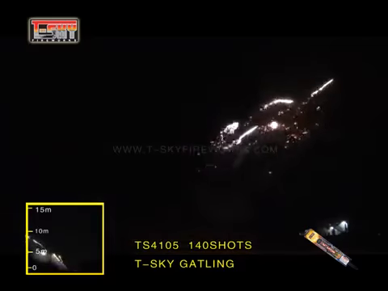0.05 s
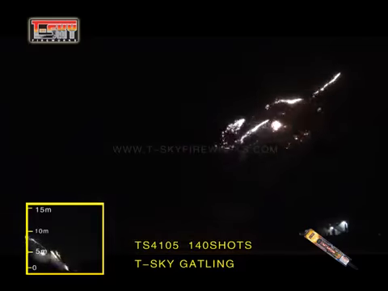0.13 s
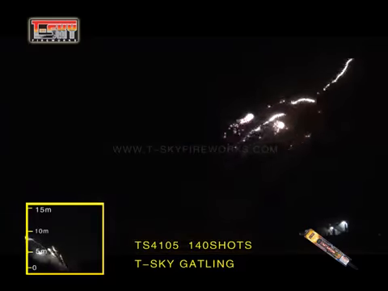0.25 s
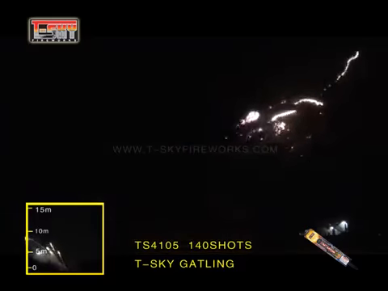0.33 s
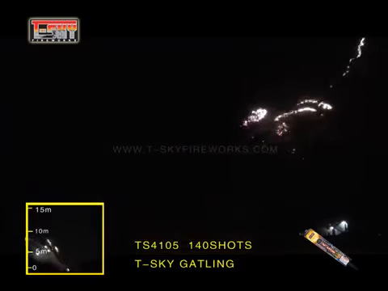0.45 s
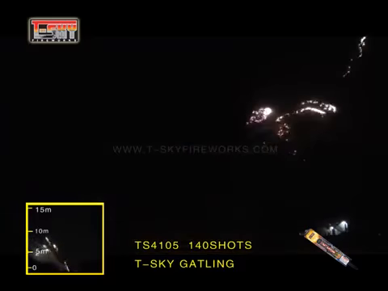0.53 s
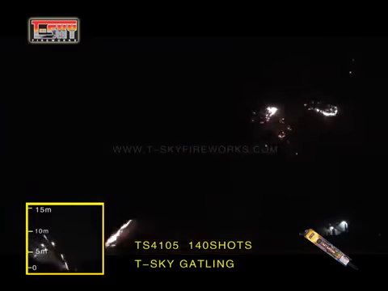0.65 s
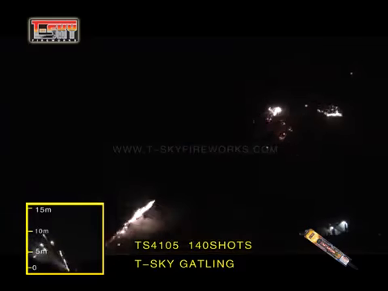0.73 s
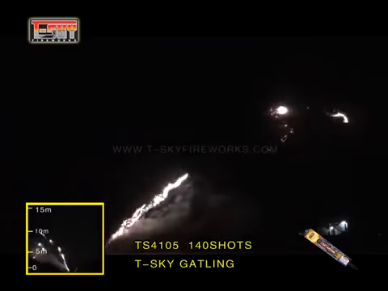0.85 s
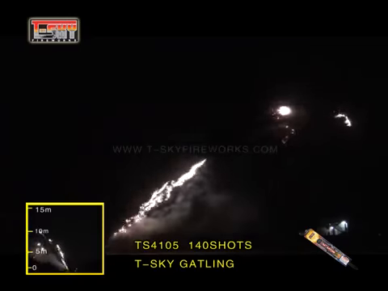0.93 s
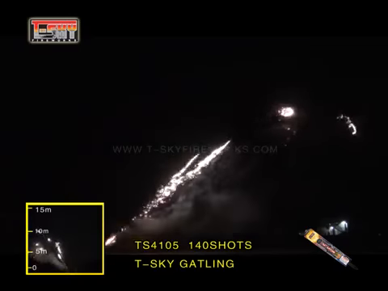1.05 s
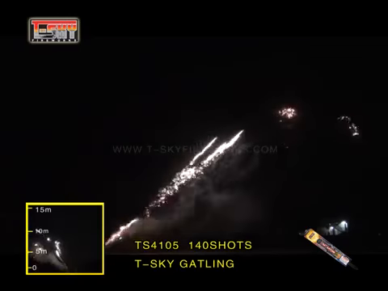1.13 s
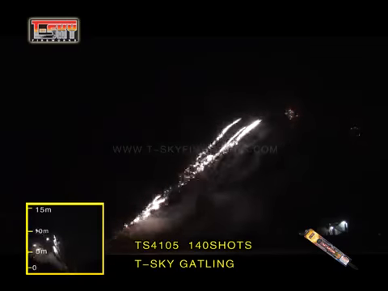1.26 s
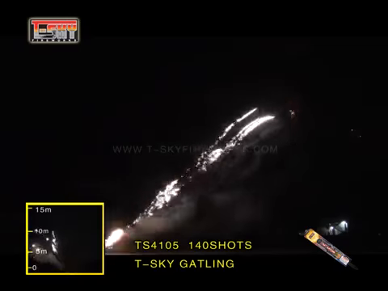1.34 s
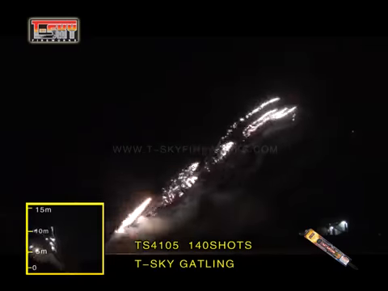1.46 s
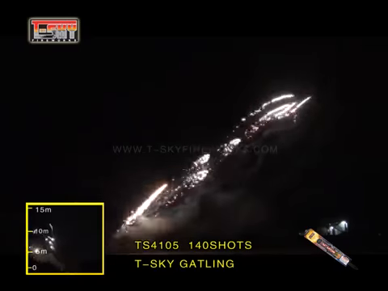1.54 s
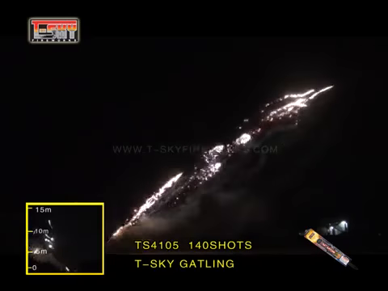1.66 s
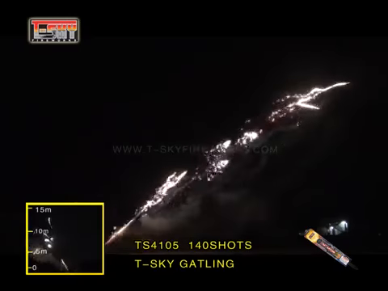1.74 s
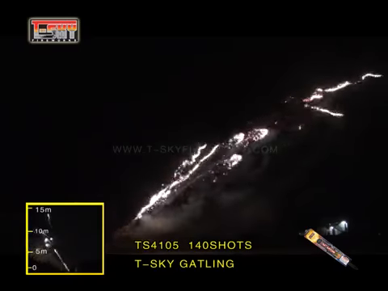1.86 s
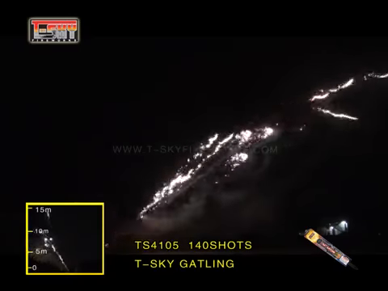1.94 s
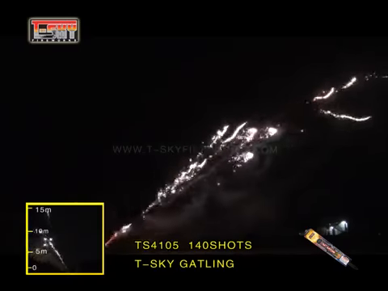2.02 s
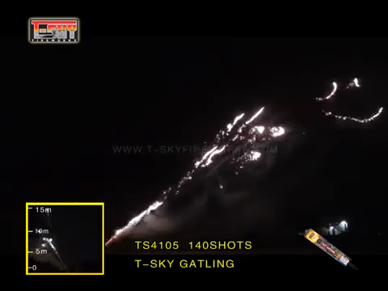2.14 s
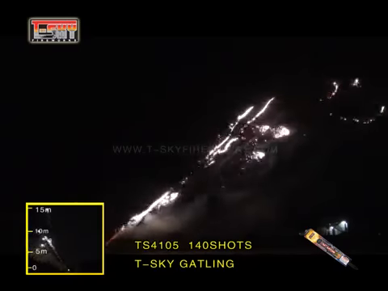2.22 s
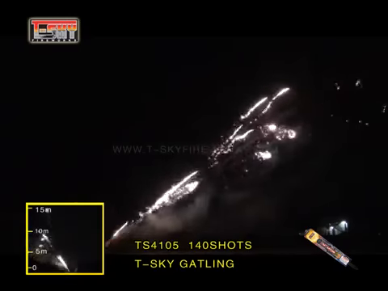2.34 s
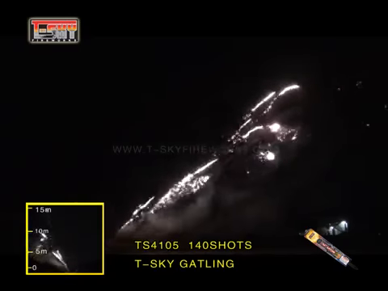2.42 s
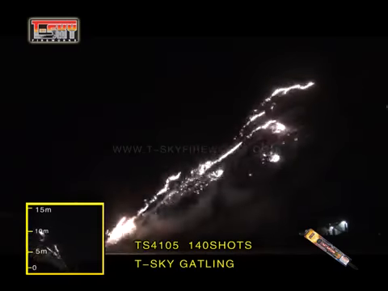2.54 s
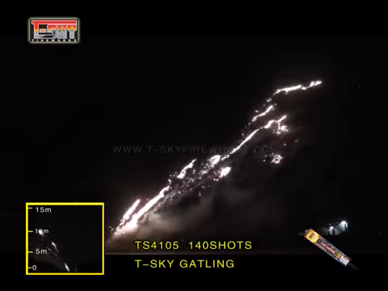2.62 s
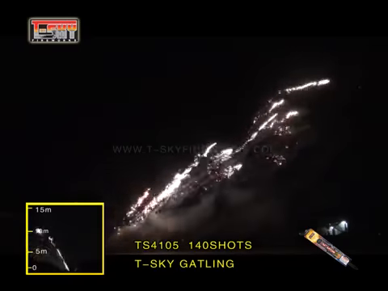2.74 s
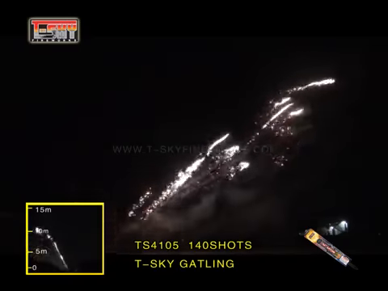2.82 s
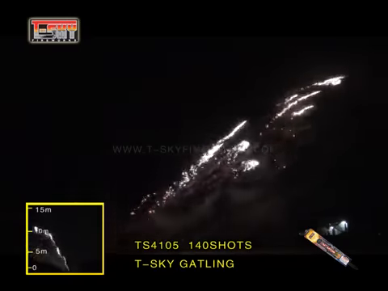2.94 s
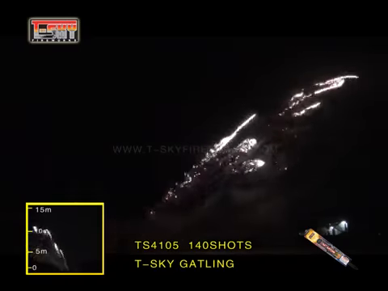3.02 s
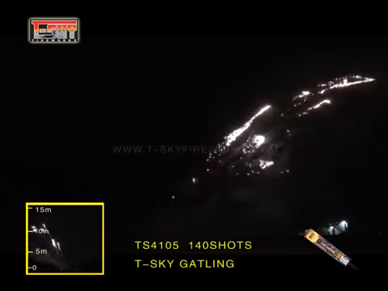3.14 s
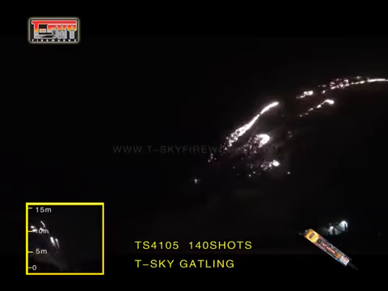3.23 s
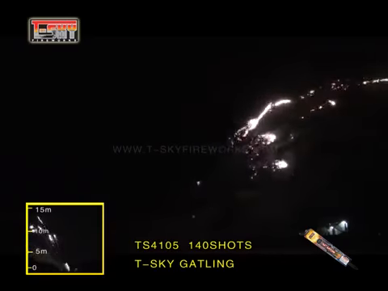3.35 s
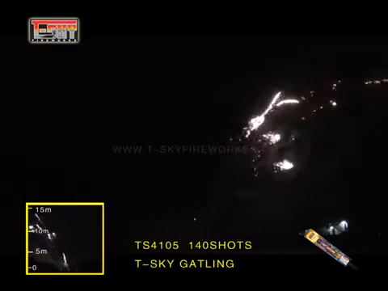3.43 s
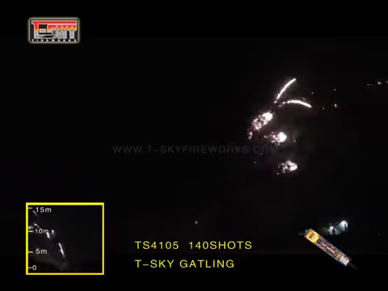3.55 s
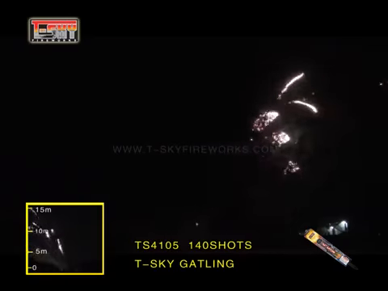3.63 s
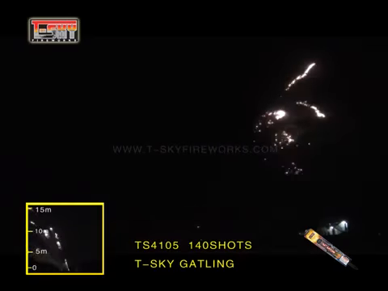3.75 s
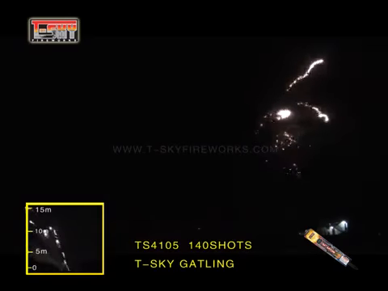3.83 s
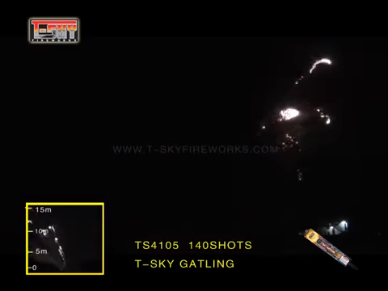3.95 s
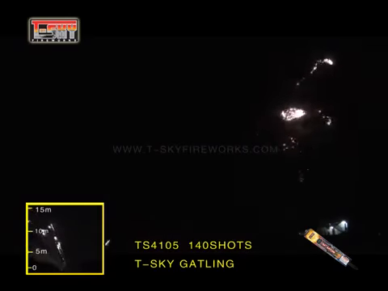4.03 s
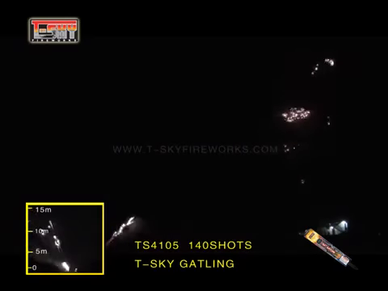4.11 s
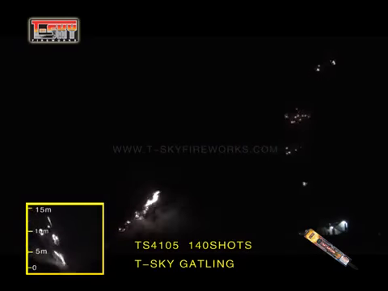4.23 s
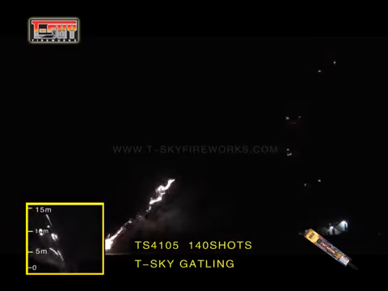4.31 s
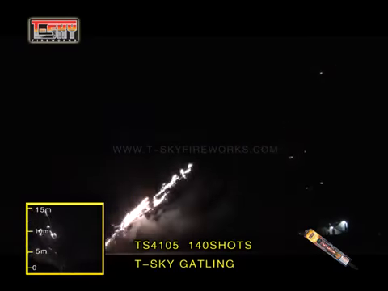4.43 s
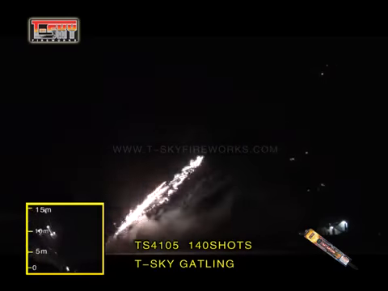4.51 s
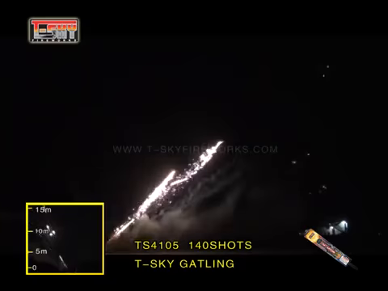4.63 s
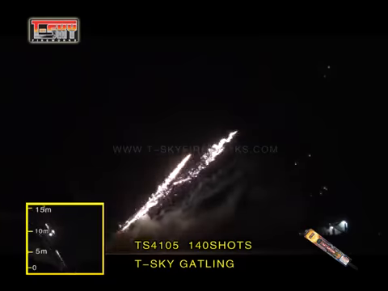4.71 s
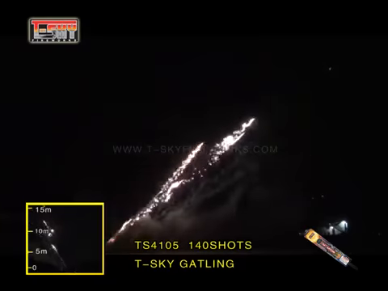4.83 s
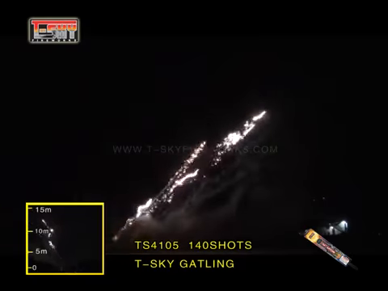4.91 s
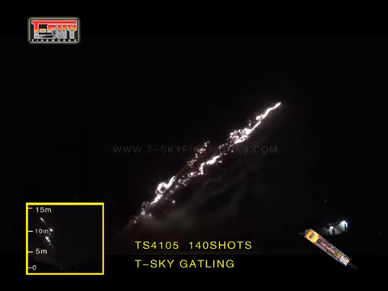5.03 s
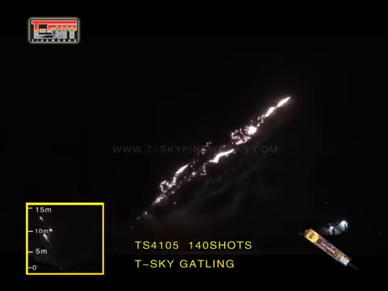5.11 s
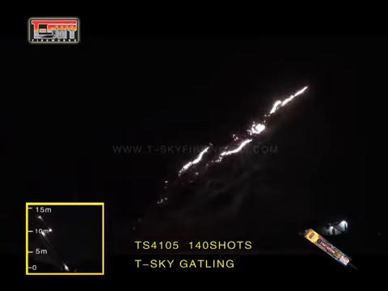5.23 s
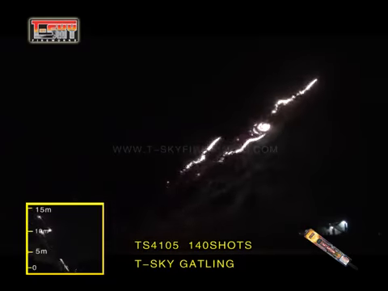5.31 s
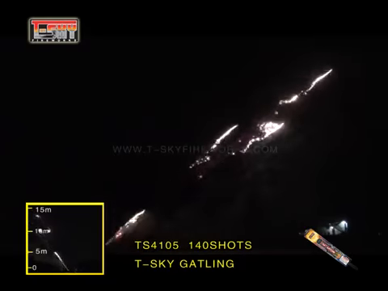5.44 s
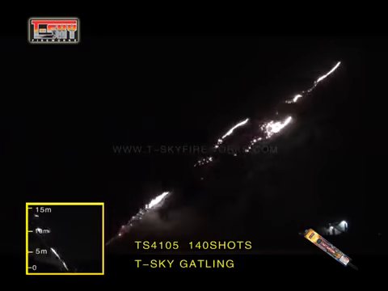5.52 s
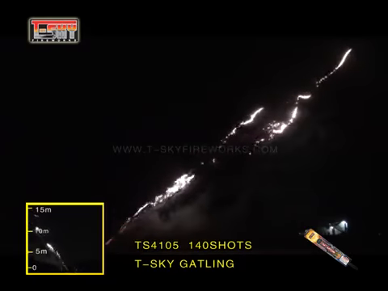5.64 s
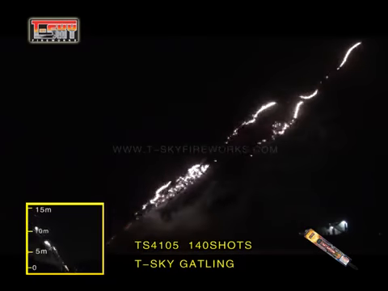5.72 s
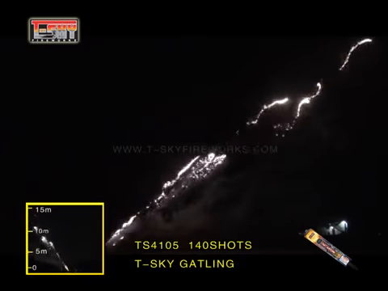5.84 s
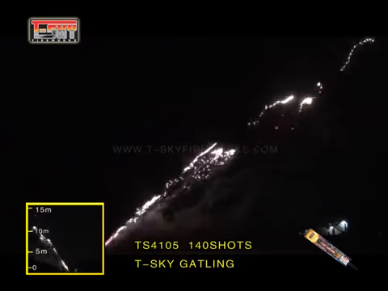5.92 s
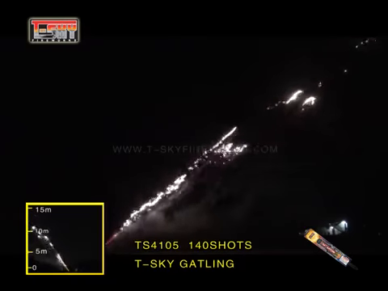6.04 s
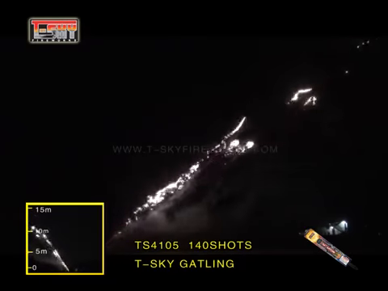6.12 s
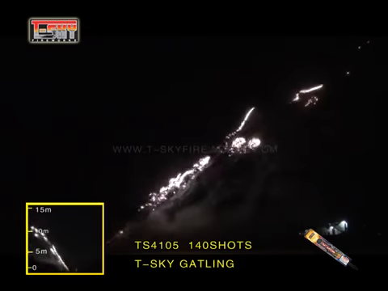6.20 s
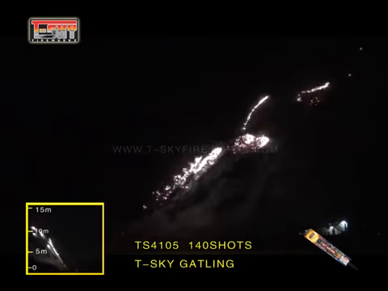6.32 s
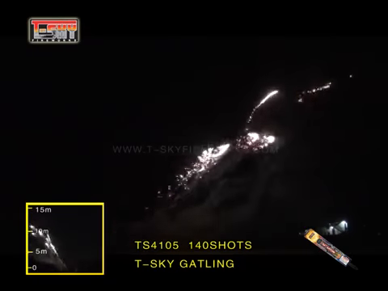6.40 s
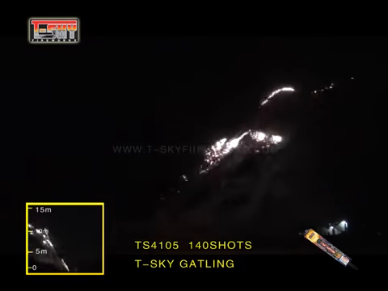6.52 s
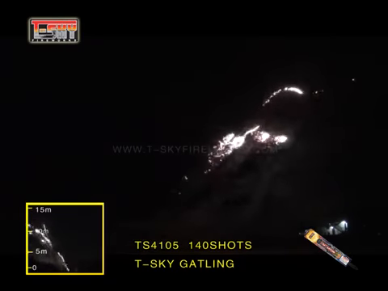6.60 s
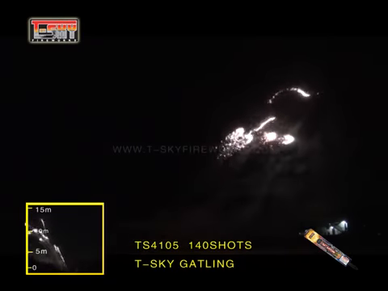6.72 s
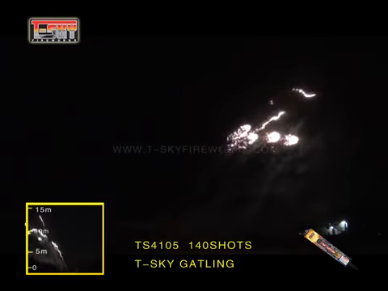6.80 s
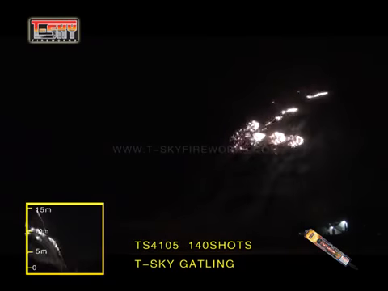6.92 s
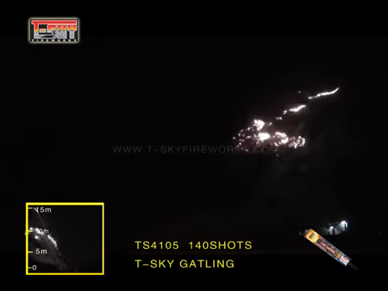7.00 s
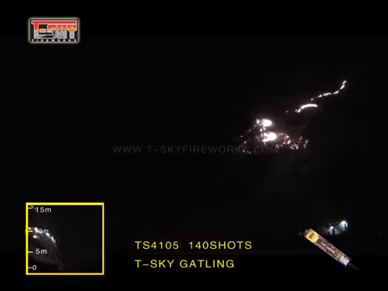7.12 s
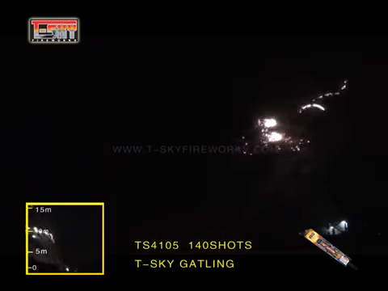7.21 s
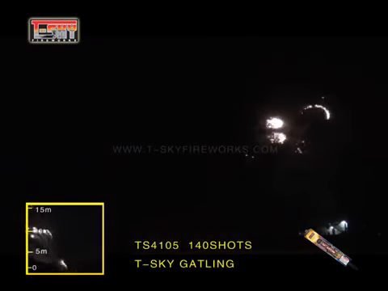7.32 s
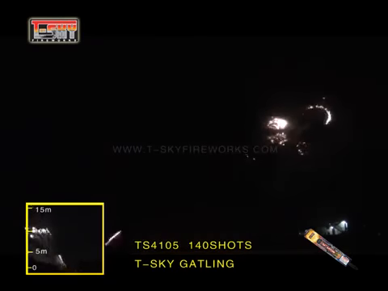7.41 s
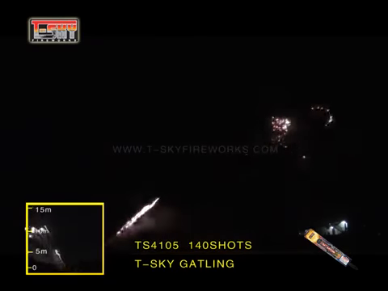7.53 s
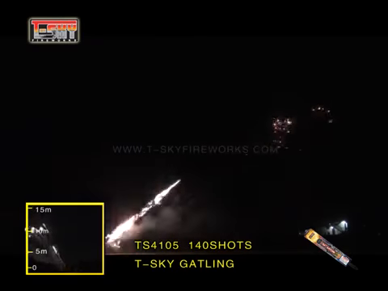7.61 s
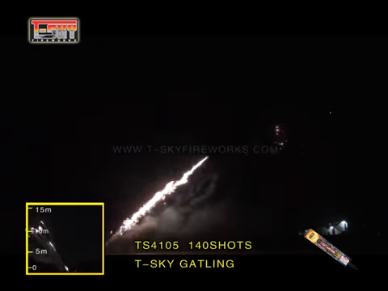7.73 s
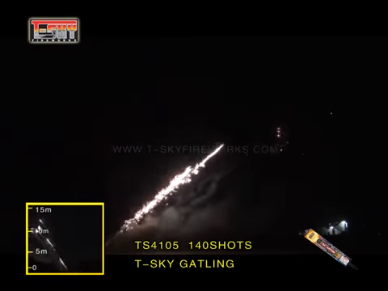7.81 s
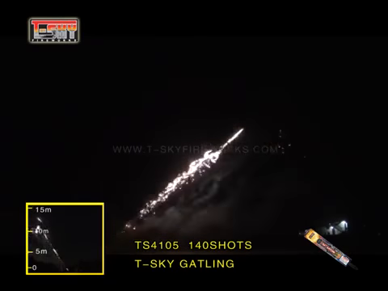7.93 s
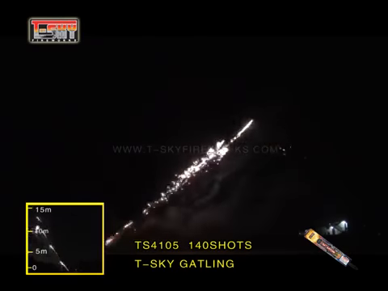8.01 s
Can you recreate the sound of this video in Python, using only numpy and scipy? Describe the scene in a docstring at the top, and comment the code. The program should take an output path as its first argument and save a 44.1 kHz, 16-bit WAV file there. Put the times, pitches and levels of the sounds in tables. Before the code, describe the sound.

Outdoors at night, a firework tube fires salvos of whistling stars. Piercing, raspy tones overlap, jumping high then gliding down and fluttering, with gas hiss and fine spark crackle. Dry pops cluster as shots leave, the hardest around four and a half seconds. Between salvos the whistles thin out. Low thumps roll briefly in the distance; a camera microphone ducks around the loudest pops.

```python
"""Whistling stars from a roman candle at night, in salvos, heard by a camera with two microphone ports.
Each star is a harmonic tone with half tones between, gliding and roughening as its tube burns; gas hisses along.
Lift charges are pressure pulses with echoes; sparks are tiny pulses over hiss; far shells thump and roll.
A light breeze lies underneath, and the camera's look-ahead limiter ducks everything around the loudest pops.
"""
import sys
import numpy as np
from scipy import signal
from scipy.fft import rfft, irfft, next_fast_len
from scipy.io import wavfile
from scipy.ndimage import uniform_filter1d, minimum_filter1d, map_coordinates

SR = 44100
rng = np.random.default_rng(int(sys.argv[2]) if len(sys.argv) > 2 else 0)


def inscribe(sig):
    """Save sig as 16-bit PCM at rate SR to the path in sys.argv[1].

    A 1-D sig is mono; a 2-D sig holds one channel per row.
    Samples are clipped to [-1, 1] before scaling.
    """
    pcm = np.round(np.clip(np.atleast_2d(sig).T, -1, 1) * 32767)
    wavfile.write(sys.argv[1], SR, pcm.astype(np.int16))


N = 355442


def amp(db):
    """Gain of a level in dB."""
    return 10 ** (np.asarray(db) / 20)


def unit(x):
    """Scaled to rms 1."""
    return x / np.sqrt(np.mean(x ** 2) + 1e-20)


def along(points, hz):
    """(frequency [Hz], value) points read on a log frequency axis."""
    f, v = np.transpose(points)
    return np.interp(np.log(hz + 1), np.log(f + 1), v)


def wobble(rate, size=N):
    """A smooth random curve with rate knots a second."""
    knots = rng.standard_normal(int(size * rate / SR) + 4)
    return map_coordinates(knots, [np.arange(size) * rate / SR])


def filtered(x, response):
    """x filtered by a complex response of frequency [Hz]."""
    m = next_fast_len(N + 8192)
    return irfft(rfft(x, m) * response(np.fft.rfftfreq(m, 1 / SR)), m)[..., :N]


def noise(spectrum, spread):
    """Coloured stereo noise of rms 1; spread weights the part that is opposite at the two ports."""
    mid, side = filtered(rng.standard_normal((2, N)), lambda hz: amp(along(spectrum, hz)))
    return unit(np.array([mid + spread * side, mid - spread * side]))


def blast(push_ms):
    """A pressure push of peak 1, lasting push_ms, then a suction; the air has rounded its front."""
    u = np.arange(300) / SR / (push_ms / 1000)
    front = 1 - np.exp(-u / .1)
    pulse = (1 - u) * np.exp(-u) * front
    return pulse / pulse.max()


def breeze(level_db=-58):
    """Light wind on the microphone: low noise that differs partly between the ports."""
    return amp(level_db) * noise([(15, -5), (50, -11), (120, -23.5), (400, -80)], spread=0.44)


# Levels of the surroundings before the microphone:
# (time [s], rolling rumble [dB], spark crackle [dB])
SURROUNDINGS = [(0, -43.5, -39.5), (.3, -42, -47.5), (.72, -52.5, -39.5), (1.0, -42, -42),
                (1.4, -41, -38.5), (1.7, -49, -30.5), (2.0, -48.5, -35), (2.35, -46.5, -38),
                (2.698, -46, -40), (3.1, -52.5, -41.5), (4.4, -50.5, -46), (4.65, -56, -39.5),
                (5.05, -68, -43), (5.5, -53.5, -43), (6.2, -73, -40.5), (7.45, -66.5, -45),
                (7.8, -48, -38.5), (8.06, -63, -41)]
# Far shells and their strongest returns:
# (time [s], thump level [dB], thump pitch [Hz], tail level [dB], tail 60 dB decay [s])
FAR_SHELLS = [(0.7489, -7, 248, -25, 1.5), (0.7541, 4, 213, -36, 1.), (0.819, -22, 230, -28, 0.32),
              (0.844, -19, 228, -24.5, 0.38), (0.886, -10, 153, -37, 0.54), (4.504, -12.5, 197, -33, 0.59)]
# Colour of the rolling noise: (frequency [Hz], relative level [dB per Hz])
ROLL_COLOUR = [(25, -40), (80, -13), (130, -3.5), (220, -1.5), (380, -11), (600, -17.5), (1500, -24.5),
               (4000, -28.5)]


def far_shells_and_rumble():
    """A far shell is a decaying low sine; its tail and the rumble are one noise rolling from all around."""
    s, roll_db, _ = np.transpose(SURROUNDINGS)
    t = np.arange(N) / SR
    swell, thumps = amp(np.interp(t, s, roll_db)), np.zeros(N)
    for at, db, hz, tail_db, t60 in FAR_SHELLS:
        since = np.clip(t - at, 0, None)
        thumps += amp(db - 60 * since / 0.016) * np.sin(2 * np.pi * hz * since)
        tail = (t > at) * amp(tail_db - 60 * since / t60)
        swell = np.hypot(swell, tail)
    roll = swell * amp(3.46 * wobble(25)) * noise(ROLL_COLOUR, spread=0.31)
    return roll + thumps


def sparks(grain_db=3, per_second=500):
    """Sparks crackle as tiny pressure pulses of random size at random moments, over a faint hiss."""
    s, _, spark_db = np.transpose(SURROUNDINGS)
    level_db = np.interp(np.arange(N) / SR, s, spark_db)
    struck = rng.random(N) < per_second / SR
    grains = struck * amp(grain_db * np.minimum(rng.exponential(size=N), 3))
    crackle = unit(np.convolve(grains, blast(push_ms=0.043))[:N])
    hiss = noise([(200, -34.0), (700, -8.0), (2500, -9.0), (9000, -7)], spread=0.1)
    busy = np.clip((level_db + 47.0) / 10, .1, 1)  # single sparks stand out only in a loud shower
    return amp(level_db) * (busy * crackle + hiss)


# Ragged gas bursts as a star leaves the tube:
# (time of the middle [s], half length to 1/e [s], level before the flutter [dB])
GAS_BURSTS = [(2.697, 0.032, -28), (4.667, 0.018, -36)]


def puffs():
    """Gas bursts from the tube: broad noise that swells, sinks and flutters roughly."""
    t = np.arange(N) / SR
    swell = sum(amp(db) * np.exp(-((t - s) / length) ** 2) for s, length, db in GAS_BURSTS)
    flutter = amp(4 * wobble(200))
    return swell * flutter * noise([(400, -15), (3000, -7), (12000, -20)], spread=0.1)


# Lift charges: (time [s], peak level of the direct blast before the microphone [dB])
LIFT_CHARGES = [(0.7395, -13.5), (0.796, -11), (0.8032, -14), (0.9092, -10), (0.9263, -11), (1.192, -12),
                (1.259, -15.5), (1.4663, -23), (1.4739, -14), (1.7204, -10), (1.7275, -10), (1.8426, -13),
                (1.8545, -14.5), (2.147, -16), (2.225, -15), (2.2948, -16.5), (2.496, -17), (2.637, -9),
                (2.6693, -8), (2.673, -10), (2.6774, -12), (2.6833, -9), (2.704, -19), (4.215, -16),
                (4.4666, 5), (4.4719, -3), (4.5023, -9.5), (4.538, -24), (4.6224, -12.5), (4.7532, -13),
                (4.952, -13), (5.5283, -12), (5.7196, -16), (5.9514, -14.5), (6.0628, -14.5),
                (6.1006, -14.5), (7.544, -10.5), (7.587, -11), (7.7211, -10), (7.7265, -11), (7.8337, -5)]


def pops(echo_db=-20):
    """Each lift charge: a blast, a ground bounce and near echoes scattered differently at each port."""
    out, t = np.zeros((2, N + SR)), np.arange(1500) / SR
    fade = amp(-60 * t / .03)
    for s, db in LIFT_CHARGES:
        scatter = rng.standard_normal((2, len(t))) * (rng.random((2, len(t))) < .15)
        path = amp(echo_db) * fade * scatter
        path[:, 0], path[:, round(.0016 * SR)] = 1, .4  # direct blast, and the bounce 1.6 ms later
        stretch = amp(rng.normal(0, 1))  # charges differ a little in size
        shot = signal.fftconvolve(path, blast(push_ms=0.34 * stretch)[None], axes=1)
        out[:, round(s * SR):][:, :shot.shape[1]] += amp(db) * shot
    return out[:, :N]


def echoes(x, t60):
    """Ground and buildings send back a diffuse tail, partly different at each port."""
    t = np.arange(SR // 2) / SR
    both, apart = rng.standard_normal((2, len(t))) * amp(-60 * t / t60) * (t > .006)
    tail = np.array([both + 1.0 * apart, both - 0.087 * apart])
    return signal.fftconvolve(x, tail / np.linalg.norm(tail[0]), axes=1)[:, :N]


# Colour of burning gas: (frequency [Hz], relative level [dB])
GAS_COLOUR = [(300, -20), (1500, -22), (3000, -0.5), (4700, 5.5), (6500, -0.5), (9000, -6), (14500, -22)]


def jets(song, level_db=-20):
    """Burning gas hisses in step with the strength of the whistles."""
    power = uniform_filter1d(np.mean(song ** 2, axis=0), 900)
    burn = np.sqrt(np.abs(power) + 2e-5)  # the small term leaves a faint constant hiss
    return burn * amp(level_db) * noise(GAS_COLOUR, spread=0.04)


# Stars that tumble steadily:
# (time lit [s], turn rate [turns/s], time the mouth faces the camera [s], swing scale [dB])
STEADY_TUMBLES = [(3.91, 25, 4.08, 2), (4.33, 26, 4.415, 4), (7.15, 17.6, 7.318, 8), (7.35, 17, 7.475, 3)]


def tumble(t):
    """Level swing [dB] of a star whose mouth turns towards the camera and away."""
    rate, facing, depth_db = rng.uniform(15, 34), rng.random(), rng.uniform(0.33, 2.81)
    for lit, *steady in STEADY_TUMBLES:
        if abs(lit - t[0]) < .035:
            rate, facing, depth_db = steady
    turn = 2 * np.pi * rate * (t - facing) + .25 * wobble(9, size=len(t))
    return depth_db * (np.tanh(1.17 * np.cos(turn) + 0.306) - .4)


FLICK_S, FLICK_DB = .022, 6  # length of the flick, and its lift: a last flare, not a fade
# Stars whose pitch flicks as the last of the charge blows out: (time out [s], pitch jump [Hz])
LAST_FLICKS = [(2.585, -250), (4.335, 600), (7.37, -200), (7.462, 700), (7.61, 350)]


def flick(t):
    """Pitch jump [Hz], growing over the last moments of a stretch."""
    jump_hz = sum(hz for out, hz in LAST_FLICKS if abs(out - t[-1]) < FLICK_S)
    return jump_hz * np.clip(1 - (t[-1] - t) / FLICK_S, 0, 1)


CATCH_PER_S = 63.7  # knots a second of the stutter while a charge catches
CATCH_DB, CATCH_SWAY = 4.5, .014  # its level scale, and its pitch stumble as a share of pitch
SWELL_S, SWELL_DB = 0.027, 5  # every stretch swells in and sinks away
# Moments when all whistling sinks: (time [s], half length to 1/e [s], depth [dB])
SHARED_LULLS = [(0.322, 0.058, 4.5), (0.87, 0.09, 8), (3.933, 0.039, 14), (4.341, 0.02, 18),
                (7.64, 0.055, 5.5)]


def loudness(t, s, db):
    """Level [dB] along a stretch: corners, swell at the ends, stutter of the catch, lulls, last flare."""
    since_start = t - s[0] + (s[0] <= 0)  # no swell where the scene cuts a stretch off
    until_end = s[-1] - t + (s[-1] > N / SR - SWELL_S)
    ends = np.minimum(since_start, until_end)
    swell_db = SWELL_DB * np.clip(1 - ends / SWELL_S, 0, 1)
    stutter_db = CATCH_DB * (t < s[1]) * np.tanh(2 * wobble(CATCH_PER_S, size=len(t)))
    lull_db = sum(depth_db * np.exp(-((t - at) / half) ** 2) for at, half, depth_db in SHARED_LULLS)
    flare_db = FLICK_DB * (flick(t) != 0)
    return np.interp(t, s, db) - swell_db + stutter_db - lull_db + flare_db


def glide(climb, corners, hz_per_s=5200, db_per_s=58):
    """A star just lit climbs to its first corner, rising in pitch and level; returns all its corners."""
    (top, top_hz, top_db), climb = corners[0], max(climb, 0)
    lit = (top - climb, top_hz - hz_per_s * climb, top_db - db_per_s * climb)
    return [lit] + list(corners)


# Salvos that carry a crowd of fainter stars: (from [s], until [s], stars [count, a fraction narrows the spacing
# and leaves the salvo's end empty], starting level [dB])
FAINT_SALVOS = [(0.881, 3.45, 14, -31), (4.547, 5.096, 2.04, -22.5), (5.651, 6.75, 6, -27.5),
                (7.758, 8.067, 3.7, -32)]


def crowd(fade_db_per_s=3):
    """Fainter stars rise quickly, then fall long and wavering, sinking in level as they fly off."""
    tables = []
    for start, end, count, db in FAINT_SALVOS:
        stars = int(count)
        for lit in start + (end - start) * (np.arange(stars) + rng.random(stars)) / count:
            age = np.array([0, .08, .25, .45, .7]) * rng.uniform(.7, 1.2)
            hz = np.array([4700, 5123, 4870, 4550, 4165]) * rng.uniform(.93, 1.04)
            hz = hz + rng.normal(0, 110, size=5)
            level_db = db - fade_db_per_s * age + rng.normal(0, 0.74, size=5)
            alive = lit + age < end + .1
            tables.append(np.transpose([lit + age, hz, level_db])[alive])
    return [rows for rows in tables if len(rows) > 1]


# Partials of a whistle: (multiple of pitch, relative level [dB]);
# the halves come from strong and weak burn pulses alternating
WHISTLE_PARTIALS = [(.5, -24.5), (1, 2), (1.5, -11.5), (2, -11.5), (2.5, -16.5), (3, -10.5), (3.5, -12),
                    (4, -2)]
# One row per stretch of whistle (a star that swings away and back has several):
# (climb to the first corner [s], corners), each corner (time [s], pitch [Hz], level [dB]);
# pitch before drift and flick, level before swells, lulls and the microphone
STRETCHES = [ (0.024, [(0, 3600, -29), (.04, 3430, -24.5), (0.072, 3250, -32)]), (0.022, [(0, 4960, -19.5),
             (.13, 4590, -24.5), (.22, 4550, -30.5)]), (0.025, [(0, 5134, -21.5), (.17, 4940, -21),
             (.43, 4880, -31.5)]), (0.005, [(.05, 3930, -27.5), (.17, 3630, -27), (.23, 3880, -29)]),
             (0.0089, [(.26, 3770, -30), (.44, 3420, -30), (.72, 3260, -33)]), (.08, [(.39, 4690, -25),
             (.48, 4390, -23.5), (.65, 4560, -24), (.745, 4455, -34)]), (0.0014, [(.37, 4090, -24),
             (.46, 3860, -25), (.63, 3656, -23.5), (.745, 3856, -22.5)]), (0.021, [(.77, 3980, -29.5),
             (1.02, 3258, -31), (1.13, 3245, -38.5)]), (.13, [(1.01, 5273, -19), (1.37, 4373, -25),
             (1.58, 4120, -31)]), (0.0063, [(.9, 4857, -20.5), (1.09, 4547, -25), (1.21, 4830, -29)]),
             (.11, [(1.19, 5280, -22), (1.34, 5080, -19), (1.46, 5090, -33)]), (0.0088, [(1.19, 3234, -34),
             (1.27, 3220, -30), (1.35, 3226, -35)]), (0.005, [(1.21, 4800, -23.5), (1.41, 3970, -29.5),
             (1.7, 3770, -33)]), (0, [(1.4, 4910, -24), (1.46, 4970, -24), (1.7, 4980, -41)]),
             (0.027, [(1.41, 5470, -25), (1.52, 5310, -21), (1.64, 5170, -26)]),
             (0.14, [(1.53, 5210, -29.5), (1.79, 4996, -26), (1.92, 4740, -47)]),
             (0.0062, [(1.58, 4050, -34), (1.66, 3805, -27.5), (1.95, 3690, -31)]),
             (0.015, [(1.78, 4150, -29), (1.9, 4016, -28), (2.05, 4150, -29)]), (0.1, [(1.97, 5256, -31.5),
             (2.14, 5023, -16.5), (2.27, 4535, -16)]), (0.02, [(1.95, 3550, -35), (2.12, 3310, -27),
             (2.23, 3360, -28)]), (0, [(1.96, 4710, -22.5), (2.12, 4320, -24), (2.29, 4885, -22)]),
             (0.03, [(2.2, 3980, -33), (2.33, 3460, -22.5), (2.585, 3390, -35)]),
             (0.001, [(2.29, 4830, -24), (2.36, 4610, -13.5), (2.42, 4470, -18)]),
             (0.0052, [(2.33, 3730, -40), (2.39, 3750, -22), (2.45, 3750, -26)]),
             (0.032, [(2.44, 5240, -17), (2.6, 5150, -20), (2.8, 5020, -21)]), (0.0045, [(2.42, 4710, -16),
             (2.5, 4550, -27), (2.55, 4450, -20)]), (0, [(2.52, 4200, -30), (2.62, 3825, -25),
             (3.15, 3538, -30)]), (0.0058, [(2.55, 5100, -34), (2.63, 4610, -24), (2.85, 4140, -36)]),
             (0, [(2.64, 4270, -29), (2.71, 4150, -29), (2.78, 3920, -24)]), (0.0025, [(2.78, 5030, -23),
             (3.2, 4277, -23), (3.38, 4190, -22.5), (3.53, 3925, -23.5)]), (.06, [(2.9, 5275, -18),
             (3.03, 5060, -21.5), (3.26, 4560, -38)]), (0.0039, [(3.03, 4010, -27), (3.24, 3854, -24),
             (3.41, 4017, -22)]), (0.045, [(3.15, 4900, -25), (3.2, 4780, -25), (3.28, 4930, -26)]),
             (0, [(3.2, 3390, -25), (3.28, 3385, -27), (3.43, 3200, -31)]), (0.071, [(3.42, 4474, -27),
             (3.63, 4247, -18), (3.9, 4120, -29.5)]), (0, [(3.4, 4690, -37), (3.55, 5130, -33),
             (3.67, 5190, -28)]), (0.0081, [(3.42, 3890, -35), (3.53, 3490, -25), (3.8, 4080, -23)]),
             (0, [(3.91, 4170, -22), (4.06, 3558, -19.5), (4.28, 3370, -21), (4.335, 3100, -21)]),
             (0.0085, [(4, 4390, -31), (4.13, 4770, -30.5), (4.27, 4640, -37)]), (.03, [(4.36, 4760, -25.5),
             (4.45, 5410, -17), (4.9, 4783, -21), (5.17, 4234, -26)]), (0.017, [(4.58, 4915, -27),
             (4.67, 4680, -24), (4.78, 4980, -24)]), (.05, [(4.98, 5310, -25.5), (5.23, 4753, -28),
             (5.69, 3734, -19)]), (0.084, [(5.17, 4300, -24.5), (5.21, 4360, -19.5), (5.25, 4420, -30)]),
             (0.00094, [(5.2, 5310, -18), (5.55, 4515, -29), (5.63, 4730, -24)]),
             (0.011, [(5.26, 4260, -23), (5.42, 3835, -31), (5.52, 4300, -17)]), (0, [(5.29, 3890, -28.5),
             (5.52, 3637, -26), (5.66, 3700, -35)]), (0, [(5.62, 4280, -25.5), (5.86, 3730, -25),
             (6.08, 4070, -31.5)]), (.09, [(5.74, 5287, -23), (6.08, 4890, -23.5), (6.4, 4280, -22)]),
             (0.0023, [(5.67, 4770, -20), (5.82, 4990, -24), (6.06, 4950, -21)]),
             (0.07, [(6.2, 5326, -17.5), (6.52, 4870, -20), (6.76, 4416, -28)]),
             (0.013, [(6.15, 3780, -31.5), (6.5, 4203, -29), (6.67, 3710, -32)]), (0, [(6.52, 4460, -25.5),
             (6.73, 4545, -27), (6.8, 4620, -15)]), (0.0067, [(6.69, 3780, -32), (6.75, 3678, -23.5),
             (6.92, 3885, -30)]), (0.01, [(6.8, 4660, -19.5), (6.97, 4300, -23), (7.085, 4610, -20),
             (7.18, 4390, -30)]), (0.025, [(6.82, 4180, -25), (7.06, 3726, -22), (7.16, 4030, -33)]),
             (0, [(7.07, 3550, -39), (7.19, 3460, -26), (7.37, 3390, -27)]), (0.0012, [(7.15, 4880, -28),
             (7.28, 4990, -20), (7.462, 4980, -22)]), (0.01, [(7.33, 3754, -36), (7.51, 3952, -23),
             (7.7, 4207, -32)]), (0.0064, [(7.35, 4300, -27), (7.47, 4550, -22), (7.61, 4590, -31)]),
             (0.0017, [(7.685, 4570, -26), (7.74, 4620, -30.5), (7.79, 4840, -16.5)]),
             (.07, [(7.85, 5370, -20.5), (7.93, 5140, -20.5), (8.06, 5050, -19.5)]),
             (0.013, [(7.82, 4760, -24), (7.88, 4784, -22.5), (8.06, 4530, -24.5)])]


def whistles(sway=0.0095, rasp=0.01109, sputter_db=4, grit=0.24, pan_db=1.5, late_rough=0.535):
    """Gliding tones; a fresh star's short tube sounds high and unsteady, a burnt-out one low and clean."""
    out = np.zeros((2, N))
    for rows in [glide(*star) for star in STRETCHES] + crowd():
        s, hz, db = np.transpose(rows)
        at = np.arange(max(round(s[0] * SR), 0), min(round(s[-1] * SR), N))
        t, n = at / SR, len(at)
        pitch = np.interp(t, s, hz) + flick(t)
        fresh = np.clip((pitch - 2800) / 2400, .3, .9)
        if hz[-1] > hz[1]:
            fresh = fresh * late_rough  # a star whose pitch rises again is old and steadier
        beam = tumble(t)
        dying = np.clip(1 - (s[-1] - t) / 0.0506, 0, 1)  # the last of the charge breaks up
        dying = dying * (s[-1] < N / SR - .05)

        # pitch drift, as a share of pitch
        drift = .006 * wobble(14, size=n)
        drift = drift + fresh * (sway * wobble(44.94, size=n) + rasp * wobble(420, size=n))
        drift = drift + CATCH_SWAY * (t < s[1]) * wobble(CATCH_PER_S, size=n)
        drift = drift + 0.00156 * fresh * beam  # tumbling also swings the pitch
        drift = drift + 0.015 * dying * wobble(90, size=n)
        phase = 2 * np.pi * (np.cumsum(pitch * (1 + drift)) / SR + rng.random())

        blur = 1 + .5 * wobble(700, size=n)  # flame noise smears the overtones more than the main tone
        tone = np.zeros(n)
        for k, level in WHISTLE_PARTIALS:
            level_db = level + beam * k ** 0.83  # overtones are the more directional
            if k != 1:
                level_db = level_db + 2.94 * wobble(16, size=n)  # each comes and goes on its own
            weight = 1
            if k > 1:
                weight = blur
            elif k < 1:
                weight = fresh + .5  # a fresh star has the stronger half tone
            tone += amp(level_db) * np.sin(k * phase) * weight

        # uneven burning, then flame noise that spreads skirts round each partial
        burning_db = sputter_db * fresh * wobble(59.65, size=n) + 7.6 * dying * wobble(110.6, size=n)
        tone = tone * amp(burning_db)
        tone = tone * (1 + grit * (0.48 + fresh) * wobble(900, size=n))
        edge = np.clip(np.minimum(t - s[0], s[-1] - t) / 0.0014, 0, 1)
        side = pan_db * wobble(3.2, size=n)
        out[:, at] += unit(tone) * edge * amp(loudness(t, s, db) + np.array([side, -side]))
    return out


def scene():
    """All sources as they reach the two ports."""
    song = whistles()
    returns = amp(-7.5) * echoes(song, t60=.16)
    surroundings = far_shells_and_rumble() + sparks() + breeze()
    return song + returns + jets(song) + pops() + puffs() + surroundings


# Phase between the ports: (frequency [Hz], lead of the left port [radians], negative when it lags)
PORT_LEAD = [(60, -1), (130, -1.35), (300, -1.45), (600, -1.2), (1300, -.9), (2900, -.1), (4000, -.3),
             (14500, 0)]
# Microphone treble: (frequency [Hz], level before port balance [dB])
MICROPHONE = [(3000, 5.5), (8000, 0.5), (11000, -6), (15000, -29.5)]


def record(dry, top_hz=14950, ceiling_db=-7.5):
    """The camera: port phase and balance, low cut, look-ahead limiter and band limit."""
    sign = np.array([[1], [-1]])

    def port_response(hz):
        """Treble, balance, second-order low cut at 70 Hz, and half the lead at each port."""
        colour = amp(along(MICROPHONE, hz) - 0.49 * sign) * (hz / (hz - 70j)) ** 2
        return np.exp(.5j * along(PORT_LEAD, hz) * sign) * colour

    ports = filtered(dry, port_response)
    needed = np.minimum(1, amp(ceiling_db) / (np.abs(ports).max(axis=0) + 1e-9))
    held = minimum_filter1d(needed, size=361, origin=60)  # ducks ahead of a peak and holds after it
    gain = uniform_filter1d(held, size=101)
    return filtered(ports * gain, lambda hz: hz < top_hz)


dry = scene()
out = record(dry)
inscribe(out)
```